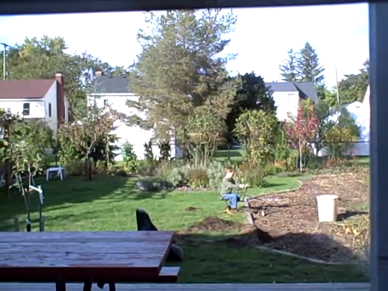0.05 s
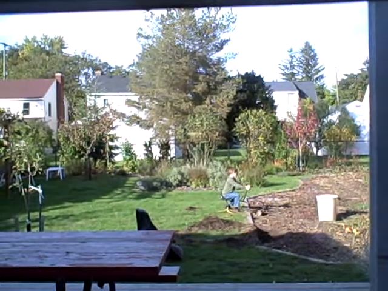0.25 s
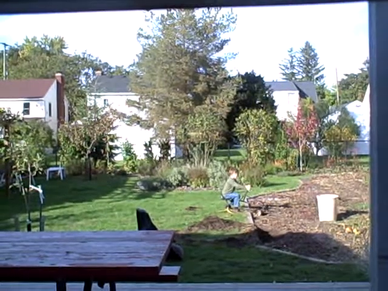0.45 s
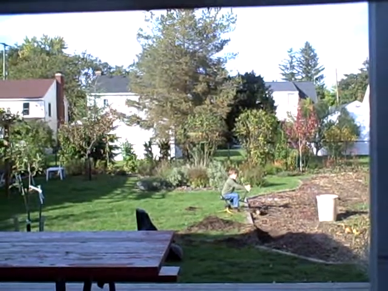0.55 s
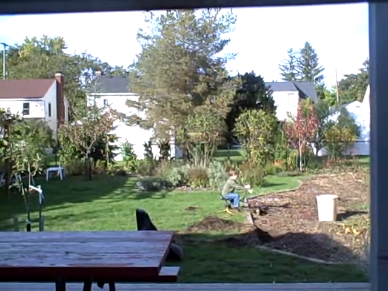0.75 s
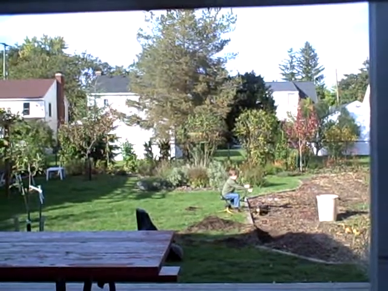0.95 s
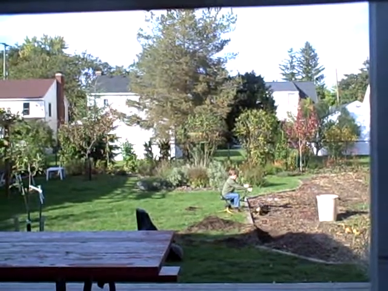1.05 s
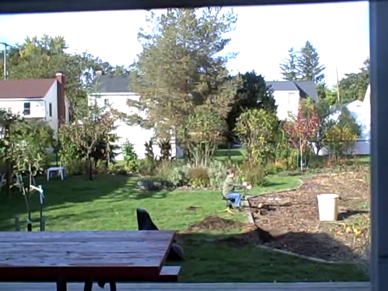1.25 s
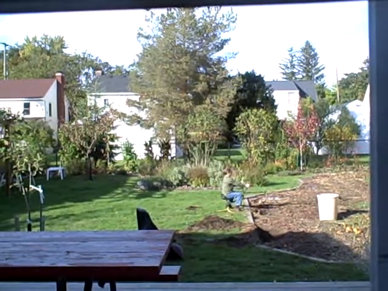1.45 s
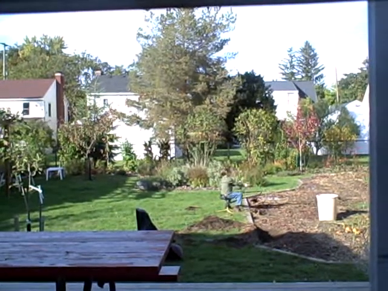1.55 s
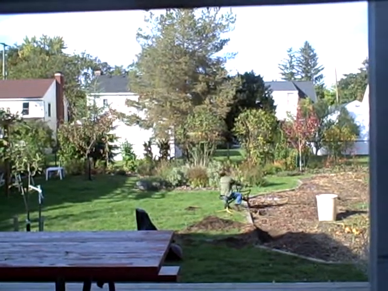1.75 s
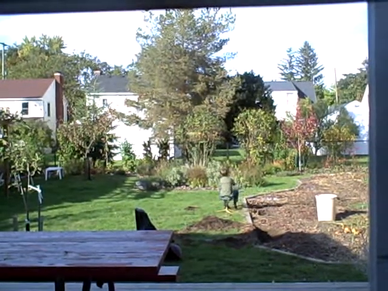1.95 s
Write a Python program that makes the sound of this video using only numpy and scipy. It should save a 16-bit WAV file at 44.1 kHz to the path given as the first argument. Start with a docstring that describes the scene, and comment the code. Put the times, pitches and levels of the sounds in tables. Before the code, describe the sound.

A single sharp squeak, like a chipmunk's chip, stands out early in a quiet garden heard from the porch. Faint leaf rustles and mulch ticks follow over steady air and far engine rumble, ending with a few distant chirps.

```python
"""One short, high, rising squeak, like a chipmunk's or bird's chip, and fences and houses answer.
Around it lies a quiet back garden: steady air, the swelling rumble of a far engine and the hum
of a small motor. Dry leaves rustle, the mulch ticks, and distant birds give a few thin
whistles and chirps."""
import sys
import numpy as np
from scipy import signal
from scipy.fft import rfft, irfft, next_fast_len
from scipy.io import wavfile
from scipy.ndimage import map_coordinates

SR = 44100
rng = np.random.default_rng(int(sys.argv[2]) if len(sys.argv) > 2 else 0)


def unload_wav(signal):
    """Save mono or channel-first audio to the path in sys.argv[1] as 16-bit WAV at rate SR, clipped to [-1, 1]."""
    wavfile.write(
        sys.argv[1],
        SR,
        np.round(np.clip(np.atleast_2d(signal).T, -1, 1) * 32767).astype(np.int16),
    )


N = 88200


def amp(db):
    """Decibels to gain."""
    return 10 ** (np.asarray(db) / 20)


def unit(x):
    """Scaled to rms 1."""
    return x / np.sqrt(np.mean(x ** 2) + 1e-20)


def clock():
    """The time of each sample in seconds."""
    return np.arange(N) / SR


def curves(rows):
    """Breakpoints to automation: one curve for each column after the time."""
    times, *columns = np.transpose(rows)
    return [np.interp(clock(), times, column) for column in columns]


def wobble(rate):
    """A smooth random curve of rms near 1, with rate knots a second."""
    knots = rng.standard_normal(int(N * rate / SR) + 4)
    return map_coordinates(knots, [clock() * rate], mode="nearest")


def filtered(x, response):
    """x shaped by a frequency response."""
    size = next_fast_len(N + SR // 2)
    return irfft(rfft(x, size) * response(np.fft.rfftfreq(size, 1 / SR)), size)[:N]


def noise(colour):
    """Noise of rms 1, coloured by (Hz, dB) points."""
    points_hz, db = np.transpose(colour)
    eq = lambda hz: amp(np.interp(np.log(hz + 1), np.log(points_hz), db))
    return unit(filtered(rng.standard_normal(N), eq))


def tone(hz):
    """A sine of rms 1 that follows a pitch curve."""
    return np.sqrt(2) * np.sin(2 * np.pi * (np.cumsum(hz) / SR + rng.random()))


# The colour of the air. Each row: frequency in Hz, relative level in dB.
AIR_COLOUR = [(12, -5), (24, -2), (36, -1), (62, 1.5), (90, -1.5), (125, -7), (165, -8.5), (280, -15.5),
              (400, -14), (520, -19.5), (700, -19), (1000, -24), (1500, -24.5), (2300, -29.5),
              (3000, -27.5), (3650, -30), (4400, -26.5), (5400, -27), (6300, -21), (7200, -30.5),
              (8000, -40.5), (9000, -49.5)]
AIR_DB = -52.5


def air():
    """Outdoor air lays a steady bed, heavy in the lows with a faint hiss on top."""
    return amp(AIR_DB) * noise(AIR_COLOUR)


# The engine's swells. Each row: time in seconds, level in dB.
ENGINE_SWELLS = [(0, -54.5), (.2, -58), (.33, -53), (.44, -56), (.58, -46), (.7, -53.5), (.88, -55.5),
                 (1.0, -65), (1.2, -58), (1.36, -48.5), (1.45, -66), (1.58, -56.5), (1.64, -56.5),
                 (1.7, -44.5), (1.8, -53.5), (2, -57.5)]
# Its harmonics. Each row: multiple of the pitch, relative level in dB.
ENGINE_HARMONICS = [(1, -8), (2, 0), (3, -11)]
ENGINE_HZ, ENGINE_WANDER = 22.95, .045


def far_engine():
    """A far engine rumbles on three low harmonics, swelling and wandering in pitch."""
    swell_db, = curves(ENGINE_SWELLS)
    hz = ENGINE_HZ * (1 + ENGINE_WANDER * wobble(30))
    rumble = sum(amp(db + 2.1 * wobble(20)) * tone(k * hz) for k, db in ENGINE_HARMONICS)
    return amp(swell_db) * rumble


# The motor's speed. Each row: time in seconds, shaft rate in Hz.
MOTOR_SPEED = [(0, 209.3), (.25, 210), (.6, 211), (.8, 212.7), (2, 212.7)]
# Its hum. Each row: multiple of the shaft rate, level in dB.
MOTOR_HARMONICS = [(1, -67.5), (2, -60)]
WHINE_HZ, WHINE_DB = 646.5, -72.8


def motor():
    """A small motor hums as it creeps up to speed, beside a fainter wavering whine."""
    shaft_hz, = curves(MOTOR_SPEED)
    hum = sum(amp(db + 0.93 * wobble(11)) * tone(k * shaft_hz) for k, db in MOTOR_HARMONICS)
    whine = amp(WHINE_DB + 0.74 * wobble(7.6)) * tone(WHINE_HZ * (1 + 0.0017 * wobble(8)))
    return hum + whine


# The rise and fall of the rustle. Each row: time in seconds, level in dB.
RUSTLE_LEVELS = [(0, -72), (.08, -62.5), (.125, -55), (.18, -60), (.42, -67), (.58, -67), (.64, -59.5),
                 (.74, -63), (.8, -59.5), (.86, -65), (.885, -57), (.95, -64), (1.04, -67), (1.12, -74.5),
                 (1.65, -78), (1.82, -68), (2, -73)]
# The crisp colour of the leaves. Each row: frequency in Hz, relative level in dB.
LEAF_COLOUR = [(500, -28.5), (2000, -11), (4500, -16), (5500, -4), (6300, 7), (7000, 1.5), (7800, -9.5),
               (9000, -29)]
CRACKLE_DB, CLUMP_DB = 3.5, -0.1


def leaves():
    """Dry leaves rustle: bright noise whose level flickers into a fine crackle."""
    db, = curves(RUSTLE_LEVELS)
    flicker_db = CRACKLE_DB * wobble(400) + CLUMP_DB * wobble(90)
    return amp(db + flicker_db) * noise(LEAF_COLOUR)


# Ticks in the mulch. Each row: start in seconds, level in dB, ring pitch in Hz, ring over snap in dB.
MULCH_TICKS = [(.10, -49, 4900, -7), (0.136, -51, 6600, 3), (.46, -54, 6400, -2), (0.509, -49, 3750, -8),
               (.72, -54, 6300, -7), (.794, -58.5, 6500, 3), (.812, -48.5, 6350, -10),
               (0.869, -45.5, 6400, -11), (1.0105, -51.5, 6300, -4), (1.029, -53, 2800, -5)]
# The colour of the snap. Each row: frequency in Hz, relative level in dB.
SNAP_COLOUR = [(500, -27), (2000, -10.5), (3700, -10.5), (5200, -3), (6500, 8.5), (7500, -6), (9000, -30.5)]
TICK_ATTACK_S, TICK_T60_S, TICK_RING_WAVER = 0.001, 0.035, 0.022


def mulch():
    """Dry mulch ticks: each is a sharp, fast-dying snap with a rough ring of its own."""
    ticks, snap = np.zeros(N), noise(SNAP_COLOUR)
    for start, db, hz, ring_db in MULCH_TICKS:
        age = np.maximum(clock() - start, 0)
        envelope = amp(db - 60 * age / TICK_T60_S) * (1 - np.exp(-age / TICK_ATTACK_S))
        ring = amp(ring_db) * tone(hz * (1 + TICK_RING_WAVER * wobble(900)))
        ticks += envelope * (snap + ring)
    return ticks


# The squeak's rising gesture. Each row: time in seconds, pitch in Hz, level in dB.
SQUEAK_GESTURE = [(.214, 2855, -34.5), (.2215, 2848, -33), (.2232, 2875, -30), (.227, 2912, -30.5),
                  (.2295, 2972, -34), (.235, 2935, -33), (.240, 3005, -34.5)]
# Its partials. Each row: multiple of the pitch, relative level in dB, attack in seconds, T60 in seconds.
SQUEAK_PARTIALS = [(1, -7.5, 0.0024, 0.033), (2, -0.5, .0022, .008)]
# The colour of its rasp. Each row: frequency in Hz, relative level in dB.
RASP_COLOUR = [(200, -25.5), (500, -5), (1000, 1), (2400, 0.5), (3600, -0.5), (5000, 0.5), (6400, 8),
               (7500, 0.5), (9000, -21)]
RASP_MIX_DB, RASP_GRIT_DB, RASP_ATTACK_S, RASP_T60_S = -12.5, 3.5, .004, .012


def squeak():
    """A high, rising chip like a chipmunk's or bird's; it rasps as it sounds and rings briefly after."""
    t, start, end = clock(), SQUEAK_GESTURE[0][0], SQUEAK_GESTURE[-1][0]

    def gate(attack, t60):
        """Opens around the start, holds through the squeak, then dies away."""
        rise = np.clip((t - start) / attack + 0.64, 0, 1)
        return rise * amp(-60 * np.maximum(t - end, 0) / t60)

    hz, db = curves(SQUEAK_GESTURE)
    hz = hz * (1 + 0.001 * wobble(600))
    ring = sum(amp(level) * gate(attack, t60) * tone(k * hz)
               for k, level, attack, t60 in SQUEAK_PARTIALS)
    grit = amp(RASP_MIX_DB + RASP_GRIT_DB * wobble(1500))
    rasp = grit * gate(RASP_ATTACK_S, RASP_T60_S) * noise(RASP_COLOUR)
    return amp(db + 0.33 * wobble(560)) * (ring + rasp)


# Slaps off fences and house walls. Each row: delay in seconds, level against the direct sound in dB.
SLAPS = [(0.0337, -21), (0.045, -28)]
TAIL_DB, TAIL_T60_S, TAIL_PREDELAY_S, TAIL_CUTOFF_HZ = -24, .45, 0.014, 3500


def yard(x):
    """Fences and houses follow the direct sound with two hard slaps and a thin, dull tail."""
    t = np.arange(SR // 2) / SR
    dull_noise = signal.lfilter(*signal.butter(1, TAIL_CUTOFF_HZ, fs=SR), rng.standard_normal(len(t)))
    tail = dull_noise * amp(-60 * t / TAIL_T60_S) * (t > TAIL_PREDELAY_S)
    tail = amp(TAIL_DB) * tail / np.linalg.norm(tail)
    slaps = sum(amp(db) * filtered(x, lambda hz: np.exp(-2j * np.pi * hz * delay))
                for delay, db in SLAPS)
    return x + slaps + signal.fftconvolve(x, tail)[:N]


# The bird calls. Each row: start in seconds, length in seconds, first pitch in Hz, last pitch in Hz,
# level in dB, waver as a fraction of the pitch.
BIRD_CALLS = [(.335, .04, 5260, 5230, -68, .014), (.38, .045, 5220, 5130, -66.5, .014),
              (.79, .13, 5200, 5230, -70, .016), (1.48, .11, 5220, 5200, -66.5, .014),
              (1.856, .03, 1690, 1480, -58.5, .008), (1.888, .016, 1590, 1570, -62.5, .008),
              (1.957, .022, 3340, 3280, -52.5, .004), (1.974, .015, 2830, 2800, -60, .008),
              (1.984, .014, 2620, 2560, -65, .012)]
FLUTTER_DB = 1.8


def birds():
    """Distant birds whistle and chirp, each call a soft-edged, fluttering glide."""
    calls = np.zeros(N)
    for start, length, first_hz, last_hz, db, waver in BIRD_CALLS:
        progress = np.clip((clock() - start) / length, 0, 1)
        hz = (first_hz + (last_hz - first_hz) * progress) * (1 + waver * wobble(350))
        arch = np.sqrt(4 * progress * (1 - progress))
        calls += amp(db + FLUTTER_DB * wobble(140)) * arch * tone(hz)
    return calls


def scene():
    """The garden from the porch, in mono: squeak and birds echo over a dry bed."""
    bed = air() + far_engine() + motor() + leaves() + mulch()
    return (bed + yard(squeak() + birds()))[None]


HIGH_CUT_HZ = 8680


def record(dry):
    """A steep high cut takes the top treble off the mix."""
    high_cut = lambda hz: 1 / np.sqrt(1 + (hz / HIGH_CUT_HZ) ** 100)
    return np.array([filtered(channel, high_cut) for channel in dry])


dry = scene()
out = record(dry)
unload_wav(out)
```